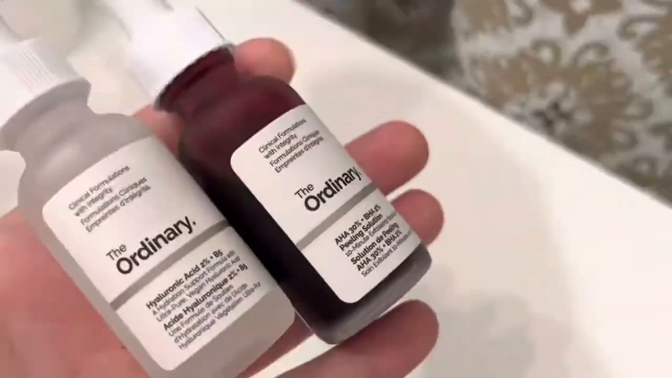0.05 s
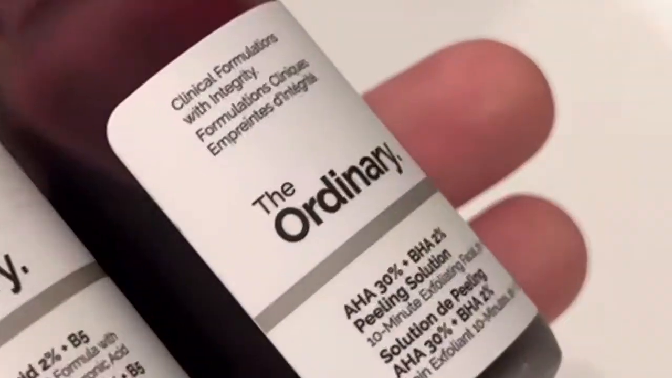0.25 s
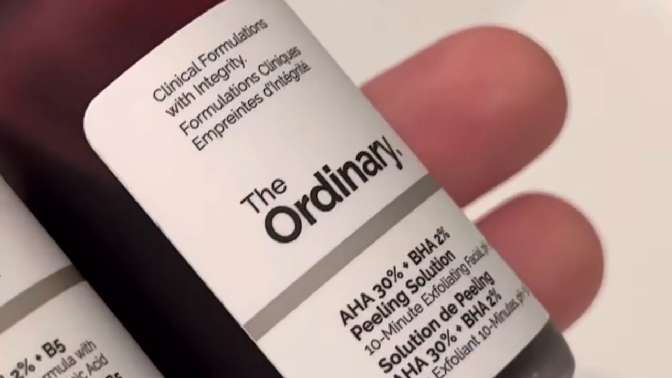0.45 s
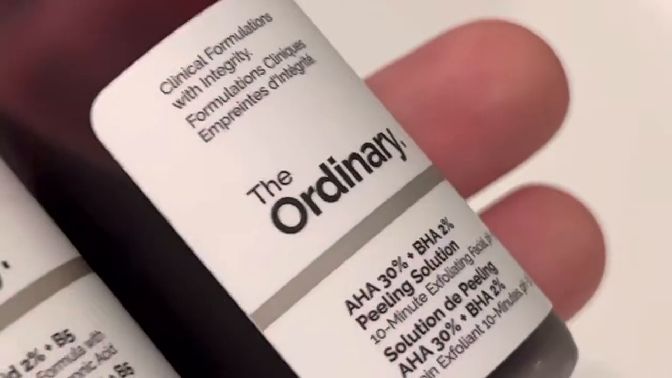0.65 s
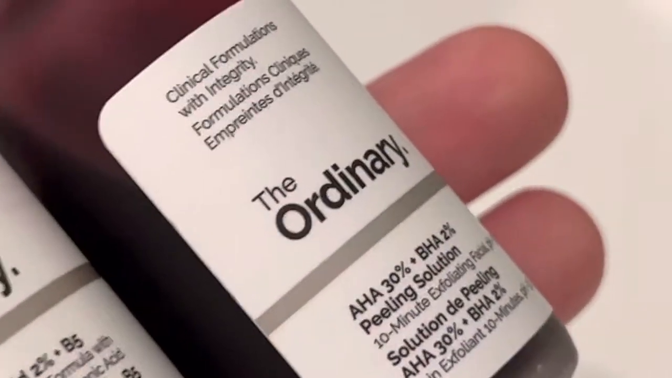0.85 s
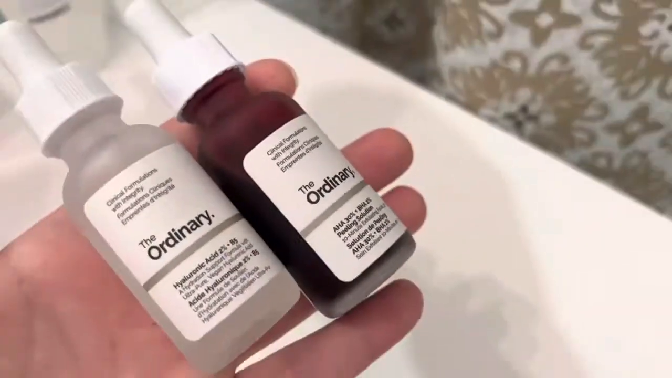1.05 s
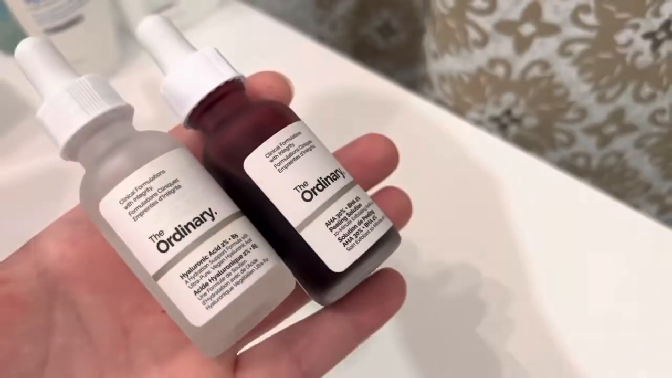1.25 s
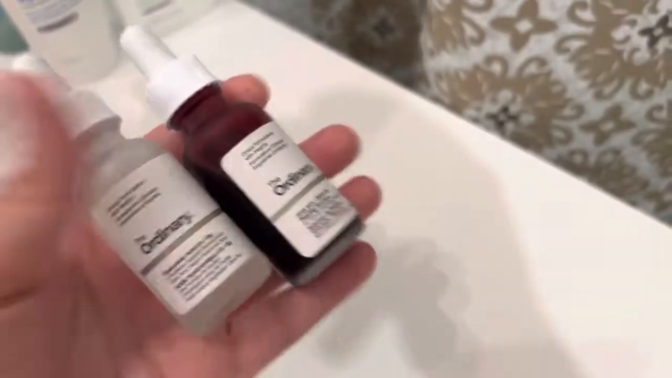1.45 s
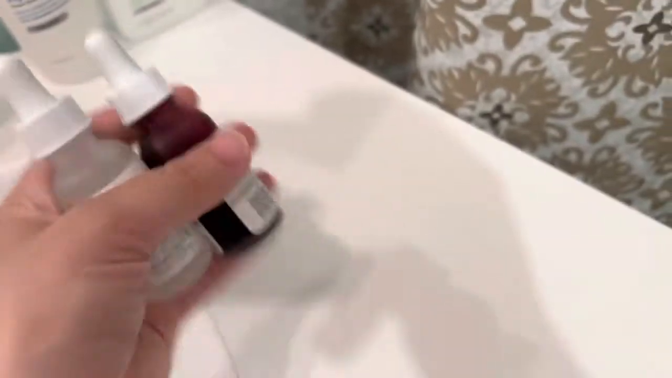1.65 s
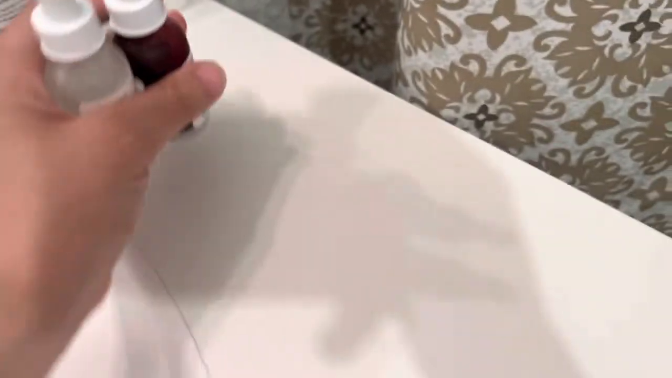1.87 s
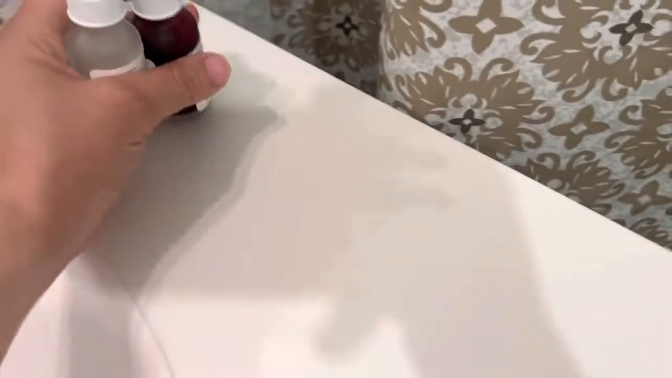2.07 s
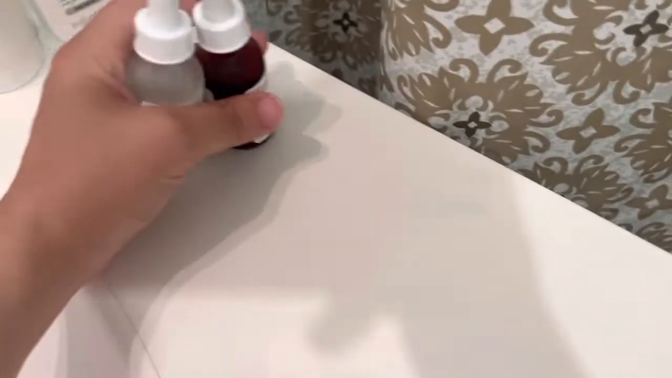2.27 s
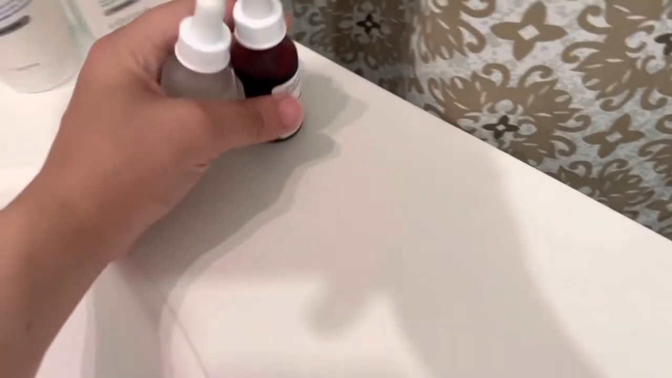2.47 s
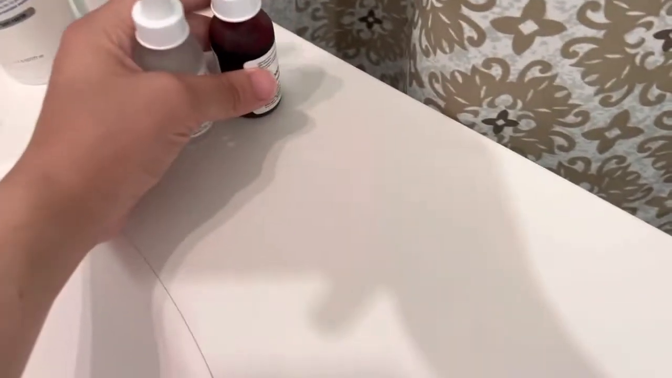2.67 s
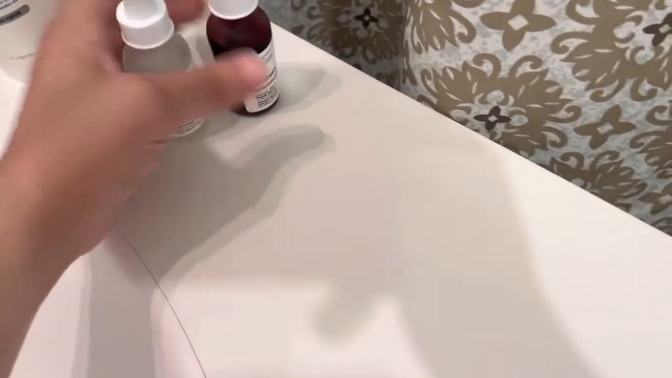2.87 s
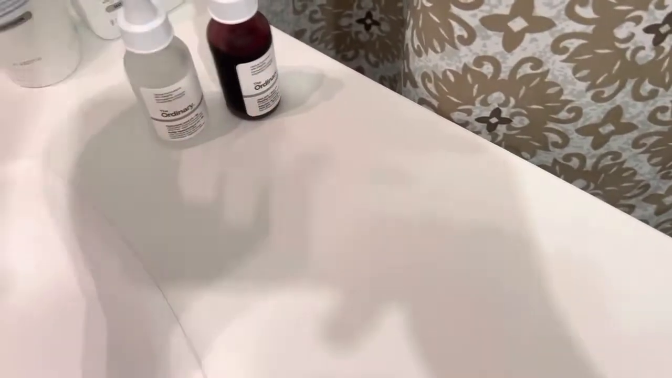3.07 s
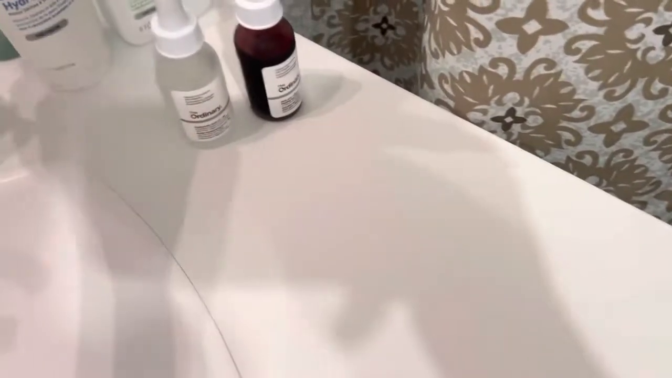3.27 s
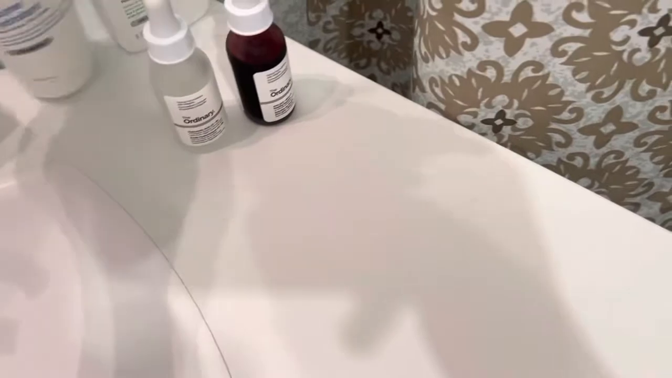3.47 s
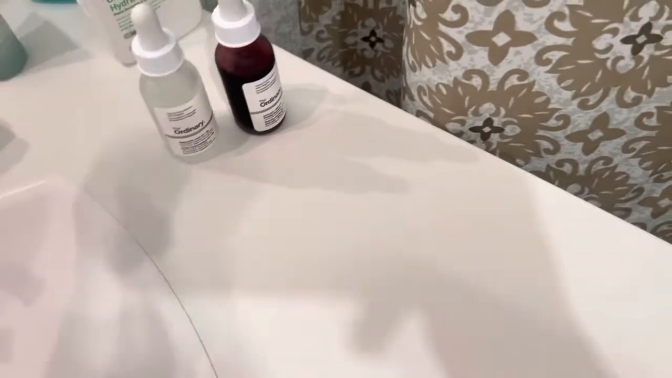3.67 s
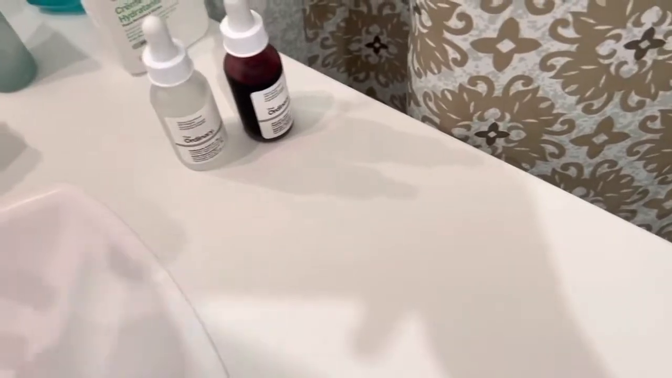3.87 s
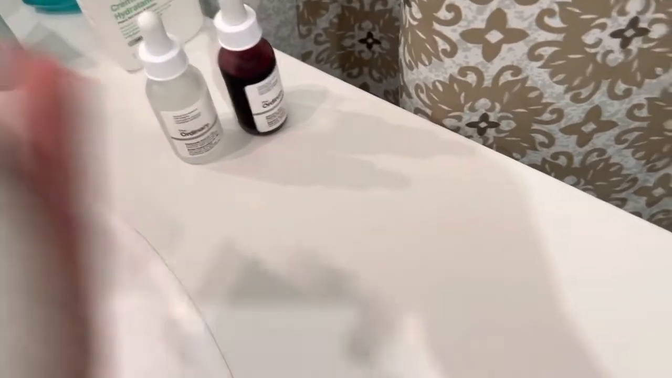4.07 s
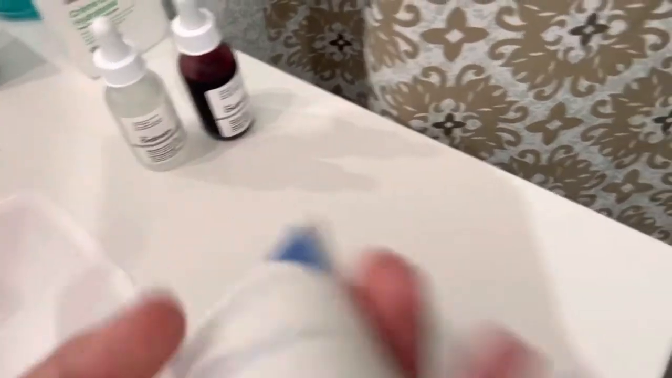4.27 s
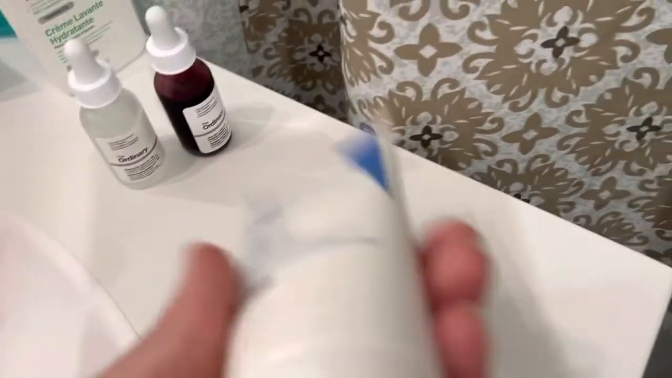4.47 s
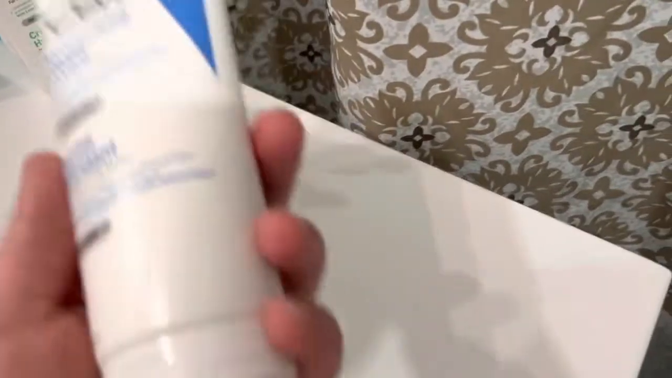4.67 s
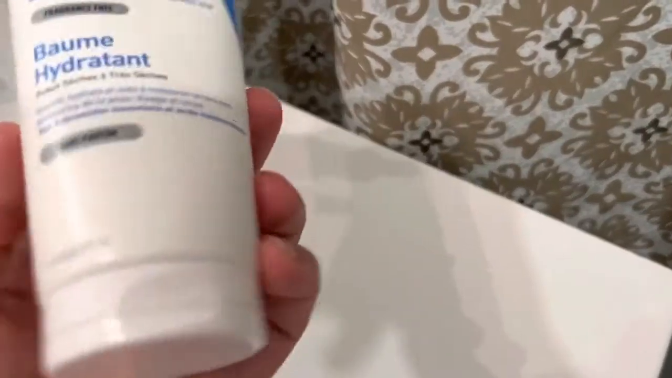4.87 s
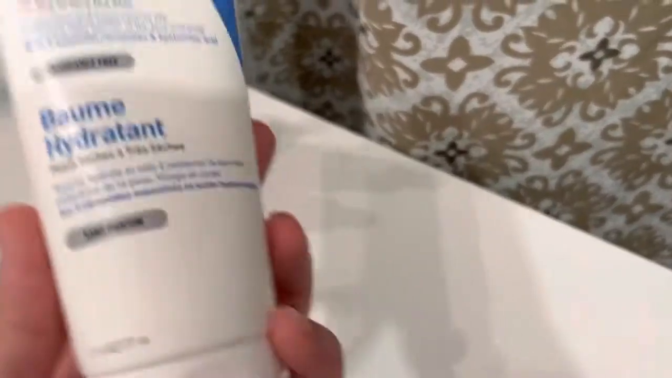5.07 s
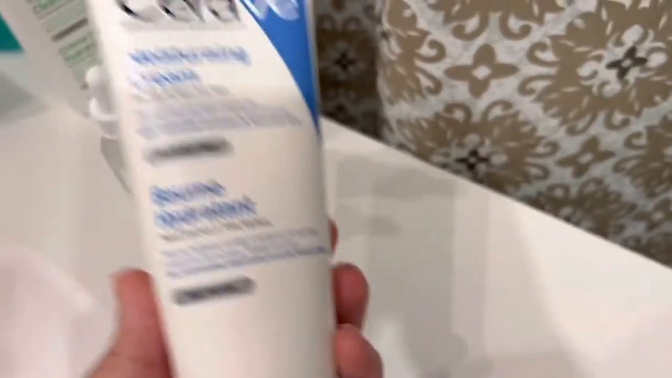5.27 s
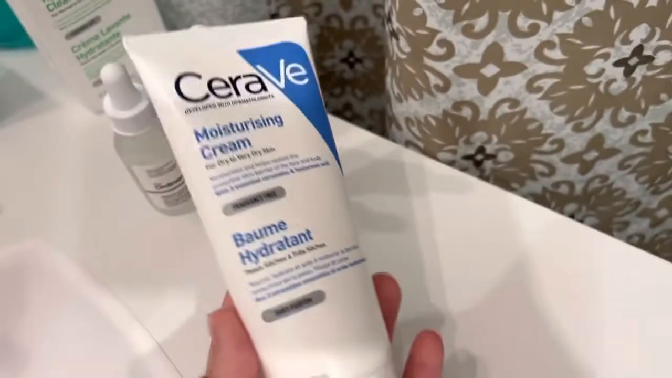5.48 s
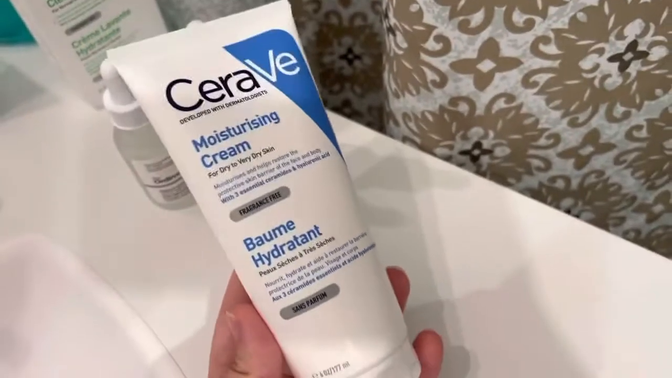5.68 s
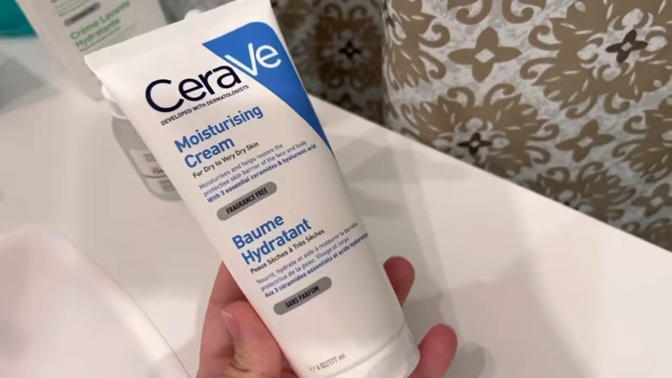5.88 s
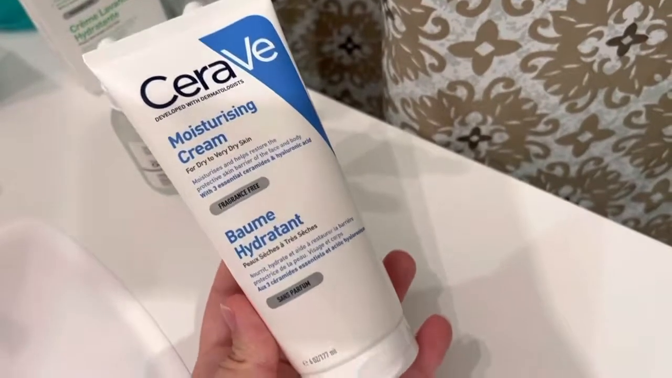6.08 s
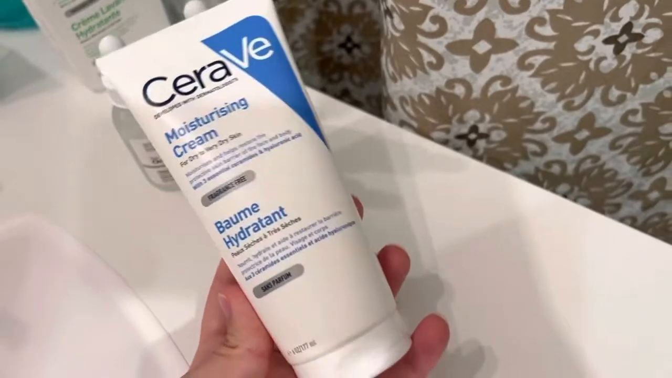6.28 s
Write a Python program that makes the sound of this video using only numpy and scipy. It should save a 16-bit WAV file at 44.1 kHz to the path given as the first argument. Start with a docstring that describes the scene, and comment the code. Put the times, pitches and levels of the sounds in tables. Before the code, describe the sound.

Small glass bottles knock onto a bathroom counter, then a plastic tube is tapped and slides through fingers over a low ventilation rumble.

```python
"""Two small glass dropper bottles are stood on a bathroom counter: two firm knocks, then a lighter
double one. Each knock shakes the counter and makes the glass tick, and one bottle skids a little.
A hand then picks up a plastic tube, which taps and hisses as it slides through the fingers.
The small, hard room rings after every knock, over a low ventilation rumble.
Everything is heard through the two microphones of a phone close by."""
import sys
import numpy as np
from scipy import signal
from scipy.fft import rfft, irfft, next_fast_len
from scipy.io import wavfile
from scipy.ndimage import uniform_filter1d

SR = 44100
rng = np.random.default_rng(int(sys.argv[2]) if len(sys.argv) > 2 else 0)


def output_pcm(signal):
    """Save a mono or channel-first signal as 16-bit PCM at the path in sys.argv[1].

    Samples are clipped to [-1, 1] before scaling.
    """
    pcm = np.clip(np.atleast_2d(signal).T, -1, 1) * 32767
    wavfile.write(sys.argv[1], SR, np.round(pcm).astype(np.int16))


N = 279153
T = np.arange(N) / SR

# glass meeting the counter; spot_hz is the pitch favoured by the place it lands on:
# start_s, level_db, dull_above_hz, low_cut_hz, spot_hz, tick_db, left_minus_right_db
BOTTLE_KNOCKS = [(2.1262, 22.5, 3500, 142, 370, -11.5, 6.5), (2.1400, 4.5, 2000, 800, 850, -21, 7),
                 (2.1445, -4, 2400, 900, 1900, -11, 2.5), (2.1645, 8, 3000, 695, 1780, -9.5, 3),
                 (2.1740, -2.5, 2400, 400, 1400, -16, 6.5), (2.2315, 5, 1900, 200, 707, -14, -0.5),
                 (2.2385, 0, 900, 205, 352.8, -28.5, -2), (2.4626, 23.5, 2900, 110, 330, -17, 5.5),
                 (2.4868, 10.5, 2610, 594, 1540, -14, 5), (2.5010, 11, 1800, 450, 1050, -15, -1.5),
                 (2.5240, -1.5, 900, 204, 500, -21.5, -0.5), (2.5600, -4, 1020, 199, 493, -14, -4),
                 (2.6265, -7, 2230, 309, 730, -16, 11), (2.8245, 10.5, 850, 101, 544, -16, 3),
                 (2.8628, 10.5, 1600, 110, 1350, -15.5, -5), (2.8670, 10.5, 860, 131, 460, -19, -7)]
# modes (natural ringing tones) of the counter with a bottle on it: pitch_hz, gain_db, ring_s
COUNTER_MODES = [(315.4, 8, 0.032), (450, 4.5, 0.029), (664, 0.5, 0.013), (760, 4, 0.024), (840, 2, 0.025),
                 (1110, 3.5, 0.016), (1227, 5, 0.0074), (1400, -5.5, 0.082), (1684, -5.5, 0.028),
                 (1870, -9, 0.052), (2223, -9, .022), (1450, -1.5, 0.0036), (800, -6, 0.0038)]
# modes of the thick glass, damped by the hand: pitch_hz, gain_db, ring_s
GLASS_MODES = [(2450, -9, .005), (2960, -1, .008), (3350, -2, .007), (3750, -6, .005), (4150, -6, .005),
               (4560, -7, .004), (5650, -8, .004), (6700, -15, .002), (8250, -13, .0018),
               (9300, -17, .0015), (11900, -17, .0015), (15200, -21, .0012)]


def bottle_knocks():
    """A bottle lands: the counter gives a knock and the glass a short, bright tick."""
    return strike(BOTTLE_KNOCKS, COUNTER_MODES, GLASS_MODES, spot_db=-10, spot_q=2.2, bend_ms=0.27,
                  lag_ms=0.0057, tick_reach=4.2, rough=1.1, scuff_ms=1.748)


def strike(blows, body_modes, tick_modes, spot_db, spot_q, bend_ms, lag_ms, tick_reach, rough, scuff_ms):
    """Each blow is a short push that rings an object. Softer contact is duller; lighter has less bass."""
    size = SR // 4
    out = np.zeros((2, N + size))
    draws = rng.standard_normal((len(blows), 3, 2 * int(.05 * SR / 2)))  # a scuff lasts up to 0.05 s
    for (start_s, db, dull_hz, cut_hz, spot_hz, tick_db, pan_db), chance in zip(blows, draws):
        body = ring(varied(body_modes, chance[0]))[:size]
        body = high_pass(body, cut_hz, order=2)
        knock = filtered(body, lambda f: 1 / (1 + .5j * f / dull_hz) ** 2)
        # where the blow lands decides which modes answer most
        knock = knock + undb(spot_db) * signal.lfilter(*signal.iirpeak(spot_hz, spot_q, fs=SR), knock)
        # bending waves carry low notes more slowly: bend_ms is the travel time at 1 kHz
        knock = filtered(knock, lambda f: np.exp(-4j * np.pi * bend_ms * np.sqrt(f / 1000)))
        # the first touch and its slips are briefer than the push, so they sound brighter
        tick = ring(varied(tick_modes, chance[1]))[:size]
        tick = signal.fftconvolve(tick, scuff(chance[2], rough, scuff_ms))[:size]
        tick = undb(tick_db) * filtered(tick, lambda f: 1 / (1 + 1j * f / (tick_reach * dull_hz)) ** 2)
        start = int(start_s * SR)
        out[:, start:start + size] += undb(db) * ports(knock + tick, lag_ms, pan_db)
    return out[:, :N]


def varied(modes, chance, detune=0.031, scatter_db=2):
    """Each blow has its own spot and grip, so the modes shift a little in pitch and level."""
    return [(hz * (1 + detune * a), db + scatter_db * b, ring_s)
            for (hz, db, ring_s), (a, b) in zip(modes, chance.reshape(-1, 2))]


def scuff(noise, rough, scuff_ms):
    """One touch, then a burst of tiny slips as the surfaces settle."""
    slips = noise * np.exp(-1000 * T[:len(noise)] / scuff_ms)
    touch = signal.unit_impulse(len(noise))
    return (touch + rough * slips / np.linalg.norm(slips)) / np.hypot(1, rough)


# a bottle's base skidding into place: start_s, length_s, first_pitch_hz, last_pitch_hz, level_db
SKIDS = [(2.137, 0.024, 724.2, 940.7, -16.5), (2.239, 0.03, 830, 885, -30)]


def bottle_skids(rise_share=.3, overtone_db=-21, unsteady=.03):
    """Glass sticks and slips on the counter very quickly, making a brief, rough, rising chirp."""
    out = 0
    wobble = 1 + unsteady * wander(300)
    for start_s, length_s, first_hz, last_hz, db in SKIDS:
        progress = (T - start_s) / length_s
        pitch_hz = np.interp(progress, [0, 1], [first_hz, last_hz]) * wobble
        phase = 2 * np.pi * np.cumsum(pitch_hz) / SR
        tone = np.sin(phase) + undb(overtone_db) * np.sin(2 * phase)
        out = out + undb(db) * swell(progress, rise_share) * tone
    return ports(out, lag_ms=0.056)


# taps of fingers and tube:
# start_s, level_db, dull_above_hz, low_cut_hz, spot_hz, tick_db, left_minus_right_db
TUBE_TAPS = [(.717, -29, 1780, 600, 1450, -36, -8), (3.2815, -22.5, 1896, 297.6, 1250, -7, 8),
             (3.299, 1.5, 150, 137.4, 230, -46, 6), (3.6722, -13, 3360, 296, 686, 0, 6.5),
             (3.9676, -24, 2000, 294, 800, -5, 11), (4.0958, 7, 2040, 110, 610, -15, 0),
             (4.1075, -8, 1503, 200, 1150, -14, 11.5), (4.840, -24.5, 2000, 300, 1040, -9.5, 8),
             (5.0938, -5.5, 1490, 800, 1390, -12.5, 6.5), (5.1030, -18.5, 1794, 600, 800, -19, -4),
             (5.1215, -18, 1900, 800, 1503, -14, -7), (5.388, -35, 1592, 299, 646, -4, 15),
             (5.503, 2.5, 53.55, 34.76, 65.6, -47, 4)]
# modes of the filled tube: pitch_hz, gain_db, ring_s
TUBE_MODES = [(99, 7, 0.062), (188, 5.5, 0.051), (398, -1, 0.0069), (757, 0, 0.026), (1070, -2, 0.01),
              (1240, -2, 0.0072), (1600, -8.5, 0.023), (2300, -24, 0.026), (2000, -18, 0.0046)]
# modes of its thin wall and cap: pitch_hz, gain_db, ring_s
PLASTIC_MODES = [(2150, 4, .004), (3100, 2, .004), (3700, 3, .003), (4400, 3, .003), (5900, 0, .002),
                 (8400, -2, .0012), (11800, -3, .001)]


def tube_taps():
    """The filled tube thuds when tapped, while its thin wall and cap click."""
    return strike(TUBE_TAPS, TUBE_MODES, PLASTIC_MODES, spot_db=-1, spot_q=1.74, bend_ms=0.37,
                  lag_ms=0.042, tick_reach=4.3, rough=3.3, scuff_ms=1.9)


# strokes of skin along the tube: start_s, length_s, relative_end_level_db, pressure_change_db
FINGER_STROKES = [(3.415, 0.19, -72.5, 8), (3.642, 0.076, -69.5, -8), (3.732, 0.16, -58, 4.5),
                  (3.962, 0.15, -51.5, 8), (4.169, 0.16, -57.5, -5.5), (4.332, 0.097, -59.5, 2.5),
                  (4.434, 0.11, -56.5, 7), (4.553, 0.071, -70.5, -6), (4.649, 0.15, -66, 0),
                  (4.845, 0.021, -69, 1)]
# tone of the sliding hiss: pitch_hz, relative_db
HISS_COLOUR = [(200, 0.5), (600, -3), (1300, -11), (2500, 0.5), (4500, -1), (6500, 2), (9000, 1),
               (12000, -6), (15500, -2.5)]
# tones of the tube's wall under a sliding finger: pitch_hz, width_hz, level_against_hiss_db
WALL_TONES = [(447, 52, -23), (577, 49, -17), (733, 52, -16), (1350, 88, -23), (2450, 125, -22),
              (3800, 255, -11.5), (5720, 750, -8.5)]


def finger_slides(gain_db=3.5, grain_db=2.5, flutter_db=2.4, catch_db=0.9, lag_ms=0.448,
                  wall_drift=0.036, wall_flicker_db=5.5):
    """Tiny slips of skin hiss and stir the tube's wall, whose tones shift as it is squeezed."""
    pressure = sum(stroke(*row) for row in FINGER_STROKES)
    pressure *= undb(flutter_db * wander(40) + catch_db * wander(440))  # the grip is unsteady
    slips = rng.standard_normal((2, N))
    slips += 0.56 * ports(rng.standard_normal(N), lag_ms, pan_db=7)  # the part both microphones share
    slip_sizes = undb(grain_db * np.minimum(rng.exponential(size=N), 5))
    hiss = unit(coloured(slips * slip_sizes, HISS_COLOUR))
    wall = 0
    for hz, width_hz, db in WALL_TONES:
        stirred = filtered(rng.standard_normal((2, N)), lambda f: 1 / (1 + 1j * f / width_hz) ** 2)
        phase = 2 * np.pi * np.cumsum(hz * (1 + wall_drift * wander(7))) / SR
        tone = stirred[0] * np.cos(phase) + stirred[1] * np.sin(phase)
        wall = wall + undb(db) * unit(tone * undb(wall_flicker_db * wander(18)))
    return undb(gain_db) * (hiss + ports(wall, lag_ms)) * pressure


def stroke(start_s, length_s, end_db, change_db, attack_s=0.029, release_s=0.017):
    """Strength of one stroke: the finger gathers speed, presses harder or eases off, then stops."""
    age = T - start_s
    attack = np.clip(age / attack_s, 0, 1)
    hold = undb(end_db + change_db * (np.clip(age / length_s, 0, 1) - 1))
    release = np.exp(-np.maximum(age - length_s, 0) / release_s)
    return attack * hold * release


# brief rubs and squeaks, except at 2.416 s: a faint, broad hiss swelling just before the second knock
# start_s, length_s, pitch_hz, width_hz, level_db
NOISE_SWELLS = [(1.028, 0.044, 2830, 450, -82.5), (1.17, 0.39, 1180, 1300, -90),
                (1.488, 0.077, 8460, 497, -71.5), (1.482, 0.12, 7760, 9200, -77.5),
                (1.62, 0.036, 11900, 4000, -81), (1.717, 0.61, 4170, 6950, -82.5),
                (1.78, 0.15, 750, 704, -78), (1.945, .11, 7200, 900, -84), (1.98, 0.29, 810, 900, -74),
                (2.416, .05, 4484, 10990, -58), (2.68, 0.079, 3000, 2930, -69.5),
                (3.366, 0.078, 4330, 7170, -59.5), (3.488, 0.46, 520, 500, -65),
                (3.981, 0.079, 6200, 1470, -55.5), (4.08, 0.055, 11500, 12200, -44),
                (4.228, 0.15, 1360, 1200, -64), (4.238, 0.022, 2540, 900, -52.5),
                (4.22, 0.24, 11300, 5030, -51), (4.484, 0.085, 12500, 6030, -56.5),
                (4.687, 0.11, 12200, 5990, -59.5), (5.011, 0.024, 11500, 9230, -66.5),
                (5.128, 0.076, 5970, 6000, -69), (5.261, 0.11, 5020, 6020, -81.5),
                (5.504, 0.08, 3190, 3500, -78), (5.9, 0.32, 1700, 1200, -79.5),
                (6.148, 0.045, 3100, 1102, -73.5)]


def rubs_and_hiss(rise_share=0.16, flicker_db=1):
    """Short, uneven swells of noise around one pitch: narrow ones squeak and wide ones hiss."""
    out = np.zeros(N + SR)
    flicker = unit(undb(flicker_db * wander(90)))
    for start_s, length_s, hz, width_hz, db in NOISE_SWELLS:
        size, start = int(length_s * SR), int(start_s * SR)
        noise = filtered(rng.standard_normal(size), lambda f: 1 / (1 + (2 * (f - hz) / width_hz) ** 2))
        out[start:start + size] += undb(db) * unit(noise) * swell(np.arange(size) / size, rise_share)
    return ports(out[:N] * flicker, lag_ms=0.015)


# tones that ring between the bathroom walls: pitch_hz, relative_db, ring_s
STANDING_WAVES = [(86, 15, .33), (133, 13, .35), (163, 15.5, .38), (210, 13, .5), (265, 10.5, .45),
                  (304, -2, .25), (338, 5.5, .5), (360, -2, .45), (375, -3, .3), (422.5, 12.5, .36),
                  (448, 1, .2), (476, 3, .35), (505, 8, .4), (544, 6, .23), (610, 11, .42), (663, 4, .36),
                  (674, 1, .34), (706, 1, .25), (730, 3, .3), (770, 2, .36), (812, 9, .42), (824, 3, .3),
                  (877, 3, .3), (896, 3, .36), (942, 8, .33), (969, 4, .22), (991, 2, .38), (1031, 10, .3),
                  (1099, 6, .33), (1127, 4, .36), (1146, 10, .36), (1194, 6, .35), (1265, 4, .36),
                  (1305, 4, .35), (1330, 5, .25), (1437, 4, .3), (1507, 3, .36), (1570, 8, .3),
                  (1705, 6, .31), (1776, 4, .33), (1892, 7, .26), (2089, 7, .2), (2169, 4, .29)]


def bathroom(first_ms=3.3, spread_ms=8.066, right_lag_ms=0.24, standing_db=-2.54, echo_db=2.3):
    """The room's answer to a click: ringing tones that set in one after another, plus dense echoes."""
    order = np.arange(len(STANDING_WAVES))
    onset_ms = first_ms + spread_ms * (order * np.sqrt(2) % 1)  # uneven, so they never add up to a slap
    standing = np.array([ring(STANDING_WAVES, (onset_ms + lag) / 1000) for lag in (0, right_lag_ms)])
    return undb(standing_db) * standing + undb(echo_db) * wall_echoes()


# tone of the echoes: pitch_hz, relative_db
ECHO_TONE = [(80, -24.5), (250, -8), (500, -0.5), (900, -3.5), (1400, -4.5), (1900, -0.5), (2800, -2),
             (5000, -6.5), (9000, -5.5), (16000, -9.5)]
# how long the echoes take to fade: pitch_hz, ring_s
ECHO_FADES = [(150, .42), (500, .37), (1200, .35), (3000, .31), (8000, .29), (16000, .24)]


def wall_echoes(first_ms=0.22, build_ms=6.8, faint_layer_db=-38, faint_layer_s=0.4, alike_hz=750):
    """Sound bounces off hard walls: the treble dies first and the low echoes last a little longer."""
    t = T[:SR]
    shared, side = rng.standard_normal((2, SR))
    side = filtered(side, lambda f: f / np.hypot(f, alike_hz))  # both microphones get the same bass
    echoes = coloured(np.array([shared + side, shared - side]), ECHO_TONE) / np.sqrt(2)
    faint_layer = undb(faint_layer_db) * np.exp(-np.log(1000) * t / faint_layer_s)
    out = 0
    for centre_hz, ring_s in ECHO_FADES:
        share = [(hz, float(hz == centre_hz)) for hz, _ in ECHO_FADES]
        band = filtered(echoes, lambda f: on_log_axis(f, share))
        decay = np.log(1000) / ring_s
        fade = np.exp(-decay * t) + faint_layer / (1 + (centre_hz / 1500) ** 2)
        out = out + band * fade * np.sqrt(2 * decay / SR)
    return out * np.clip((1000 * t - first_ms) / build_ms, 0, 1)


# tone of the ventilation's rush: pitch_hz, relative_db
VENT_COLOUR = [(19, -35.5), (32, -7), (86, -2), (159, -9), (206, -5), (241, -20.5), (267, -12),
               (355, -17.5), (484, -29.5), (595, -31), (999, -40.5), (1860, -42.5), (3120, -50.5),
               (8000, -54.5), (10500, -67), (15500, -72)]
# its humming tones: pitch_hz, level_db
VENT_HUM = [(86.1, -71), (199.2, -75.5), (274.5, -82), (360.7, -75.5)]


def ventilation(rush_db=-56.5, waver_db=-0.38, hum_waver=0.75, bass_side=0.14, alike_hz=900):
    """A low, steady rush of air with a wavering hum; its bass is nearly alike in both microphones."""
    shared, side = coloured(rng.standard_normal((2, N)), VENT_COLOUR)
    side = filtered(side, lambda f: np.hypot(bass_side, f / np.hypot(f, alike_hz)))
    rush = unit(np.array([shared + side, shared - side])) * undb(rush_db + waver_db * wander(13))
    hum = 0
    for hz, db in VENT_HUM:
        strength = 1 + hum_waver * wander(17)
        hum = hum + undb(db) * unit(strength * np.sin(2 * np.pi * hz * T + wander(2)))
    return rush + hum


def ring(modes, delays_s=0):
    """Fading tones after a click, each falling 60 dB in ring_s; neighbours swing opposite ways."""
    out = 0
    for k, ((hz, db, ring_s), delay) in enumerate(zip(modes, np.broadcast_to(delays_s, len(modes)))):
        t = np.maximum(T[:SR] - delay, 0)
        decay = np.log(1000) / ring_s
        gain = (-1) ** k * undb(db) * 2 * decay / SR
        out = out + gain * np.exp(-decay * t) * np.sin(2 * np.pi * hz * t)
    return out


def ports(x, lag_ms, pan_db=0):
    """A near sound reaches the left microphone first and the right one a little later."""
    late = filtered(x, lambda f: np.exp(-2j * np.pi * f * lag_ms / 1000))
    return np.array([x * undb(pan_db / 2), late * undb(-pan_db / 2)])


def swell(progress, rise_share):
    """A rounded rise and fall as progress goes from 0 to 1."""
    return np.interp(progress, [0, rise_share, 1], [0, 1, 0]) ** .5


def wander(rate_hz):
    """A random drift with a typical size of 1."""
    step = int(SR / rate_hz)
    steps = np.repeat(rng.standard_normal(N // step + 1), step)
    return unit(uniform_filter1d(steps, step)[:N])


def undb(db):
    """Turn decibels into a gain."""
    return 10 ** (np.asarray(db) / 20)


def unit(x):
    """Scale to an average power of 1."""
    return x / np.sqrt(np.mean(x ** 2))


def on_log_axis(hz, points):
    """Read between (pitch_hz, value) points, with octaves evenly spaced."""
    f, value = np.transpose(points)
    return np.interp(np.log(np.maximum(hz, 1)), np.log(f), value)


def filtered(x, response):
    """Scale and delay each frequency as response(hz) says."""
    size = next_fast_len(x.shape[-1] + SR // 10)
    hz = np.arange(size // 2 + 1) * SR / size
    return irfft(rfft(x, size) * response(hz), size)[..., :x.shape[-1]]


def coloured(x, points):
    """Shape a sound's tone by (pitch_hz, gain_db) points."""
    return filtered(x, lambda f: undb(on_log_axis(f, points)))


def high_pass(x, cut_hz, order):
    """Thin out the bass below cut_hz."""
    return signal.sosfilt(signal.butter(order, cut_hz, "high", fs=SR, output="sos"), x)


# how the phone blends its microphones: pitch_hz, left_share_in_right (0 to 1), left_lead_rad
STEREO_BLEND = [(300, 0, .1), (700, 0, .3), (2100, 0, .4), (2450, .5, 2.5), (2650, .5, 2.5), (2950, 0, 0),
                (5000, 0, .2), (6200, .2, 1.8), (7400, .2, .9), (8200, .6, 0), (9500, .8, 0)]


def widen(pair, treble_hz=8000, treble_lag_ms=.25):
    """The phone shifts the left channel's phase for width; the top treble is mostly from the left."""
    share = lambda f: on_log_axis(f, [(hz, part) for hz, part, _ in STEREO_BLEND])
    lead = lambda f: on_log_axis(f, [(hz, turn) for hz, _, turn in STEREO_BLEND])
    treble_lag = lambda f: 2 * np.pi * np.maximum(f - treble_hz, 0) * treble_lag_ms / 1000
    total = lambda f: np.hypot(share(f), 1 - share(f))
    left = filtered(pair[0], lambda f: np.exp(1j * (lead(f) - treble_lag(f))))
    right = filtered(pair[0], lambda f: share(f) / total(f))
    right += filtered(pair[1], lambda f: (1 - share(f)) / total(f))
    return np.array([left, right])


def scene():
    """Bottles and hand sounds, heard directly and through the room, over the ventilation."""
    room = bathroom()
    bottles = bottle_knocks()
    tube = tube_taps()
    skids = bottle_skids()
    rustle = finger_slides() + rubs_and_hiss()
    # what is held close to the microphones has less room in it, and the small tube sends little bass out
    thin_tube = high_pass(tube, 260, order=1)
    into_room = bottles + undb(-6) * skids + undb(-3.5) * thin_tube + undb(-3) * rustle
    reverb = signal.fftconvolve(into_room[:1], room, axes=-1)[:, :N]
    return bottles + skids + tube + rustle + reverb + ventilation()


def record(dry):
    """The phone widens the stereo, drops deep bass, rounds loud peaks and cuts the highest treble."""
    lean = high_pass(widen(dry), 36, order=4)
    rounded = lean / (1 + (lean / .95) ** 4) ** .25
    treble_cut = signal.ellip(10, .2, 80, 15750, fs=SR, output="sos")
    return signal.sosfilt(treble_cut, rounded)


dry = scene()
out = record(dry)
output_pcm(out)
```